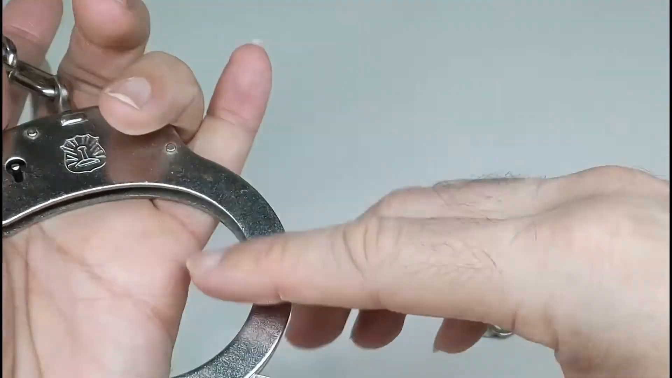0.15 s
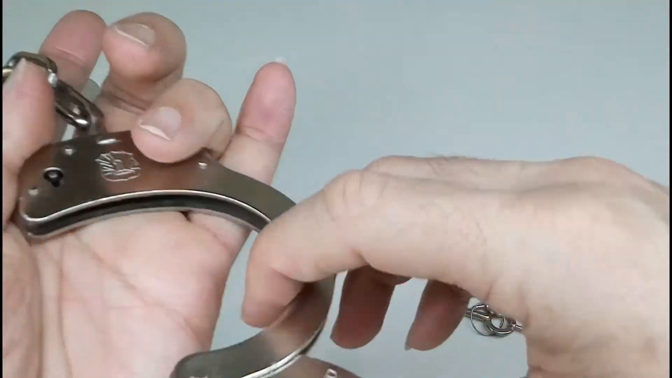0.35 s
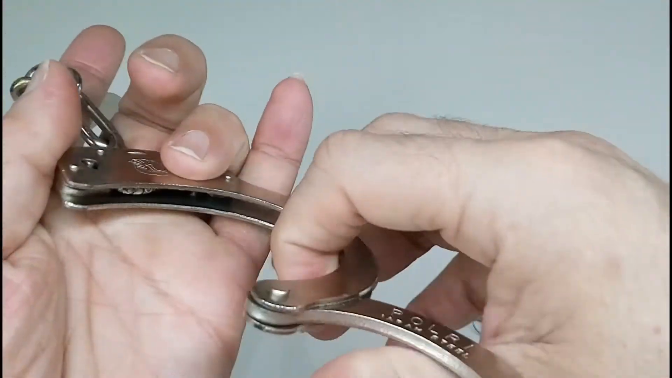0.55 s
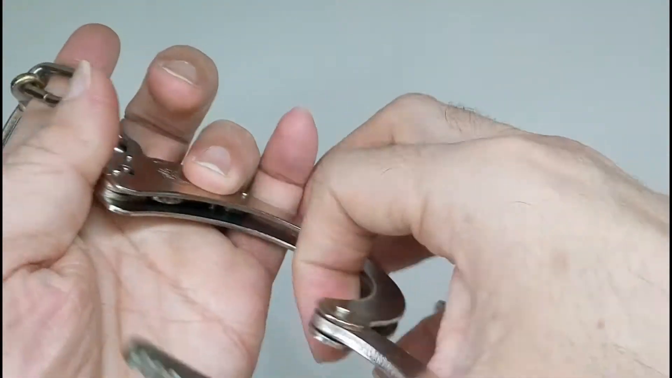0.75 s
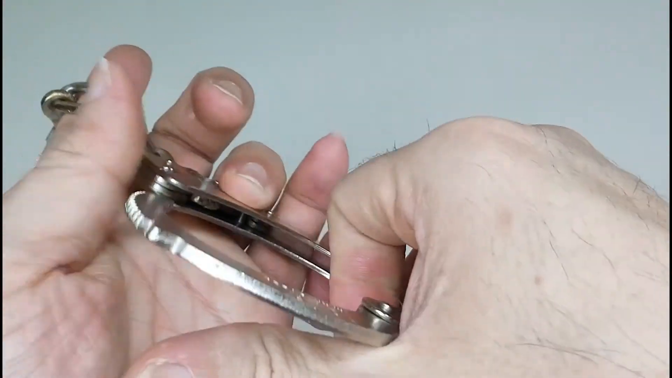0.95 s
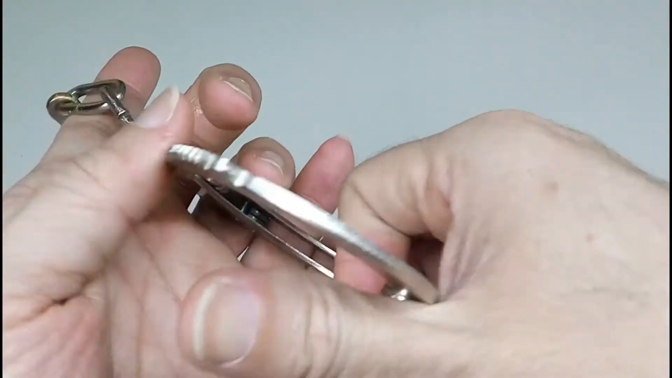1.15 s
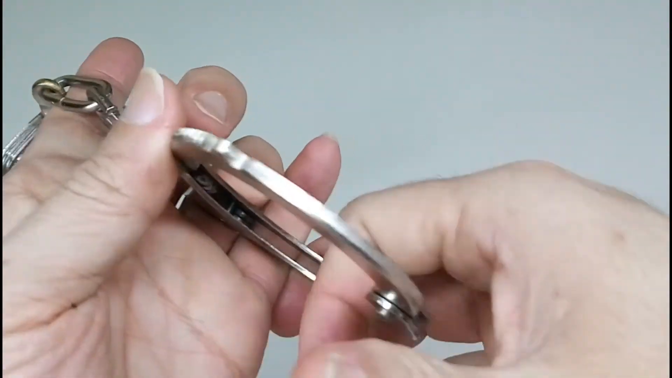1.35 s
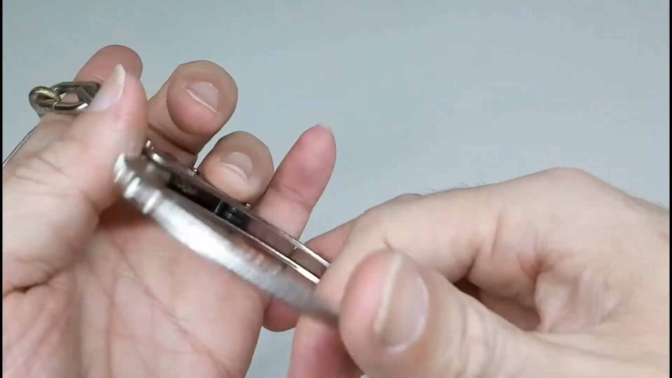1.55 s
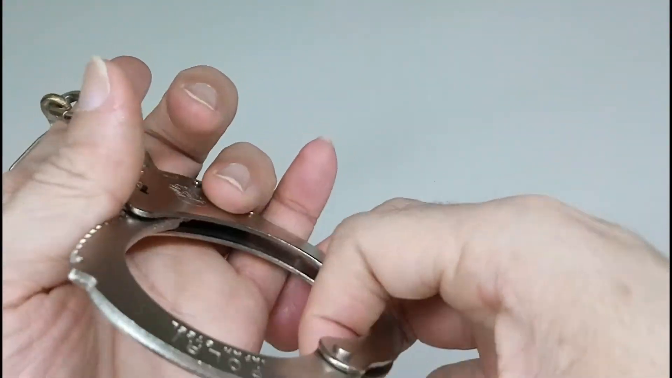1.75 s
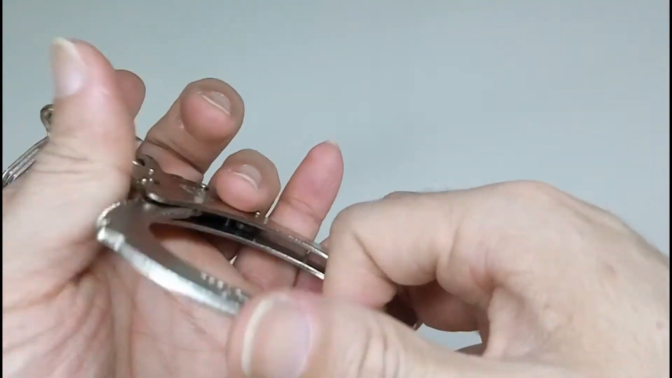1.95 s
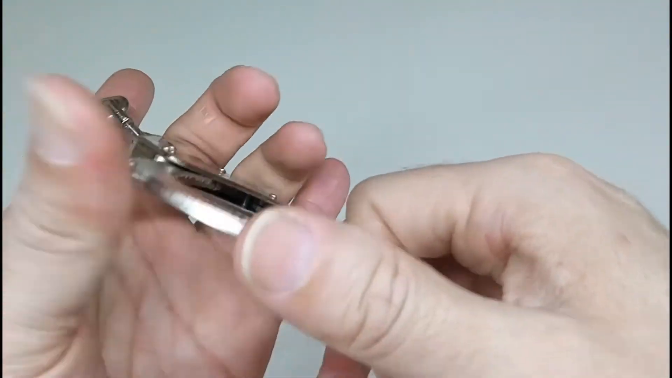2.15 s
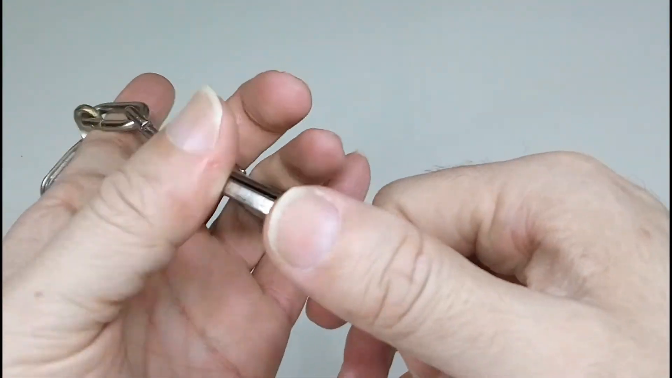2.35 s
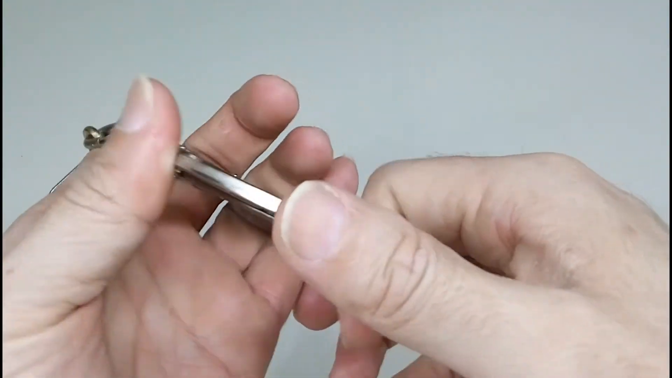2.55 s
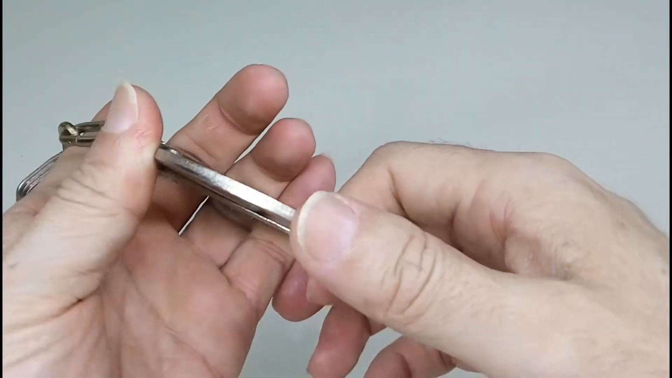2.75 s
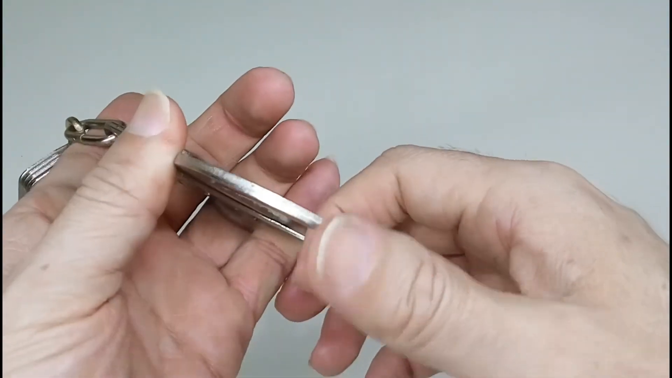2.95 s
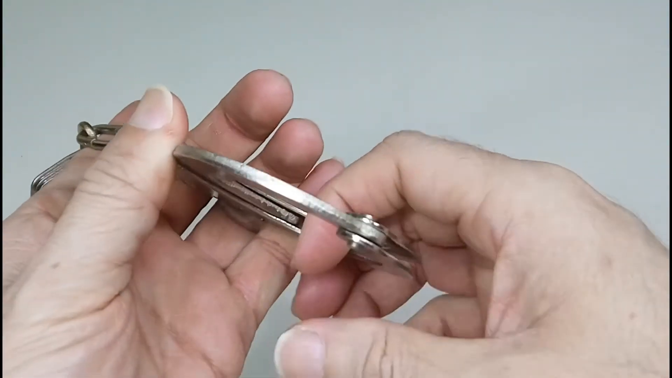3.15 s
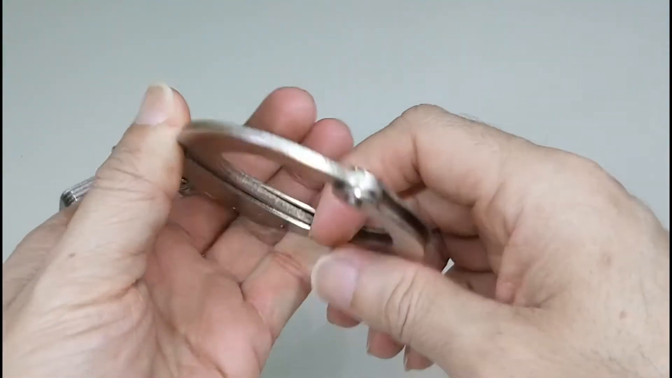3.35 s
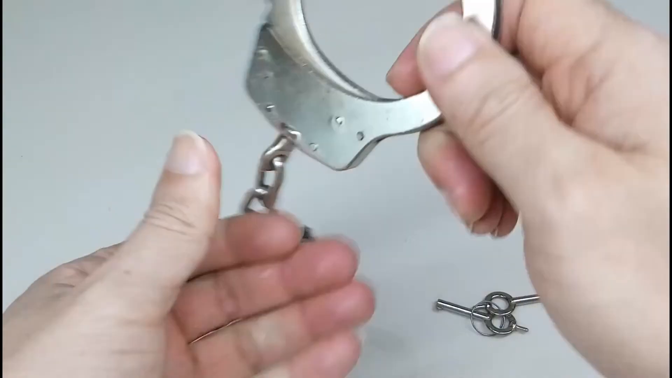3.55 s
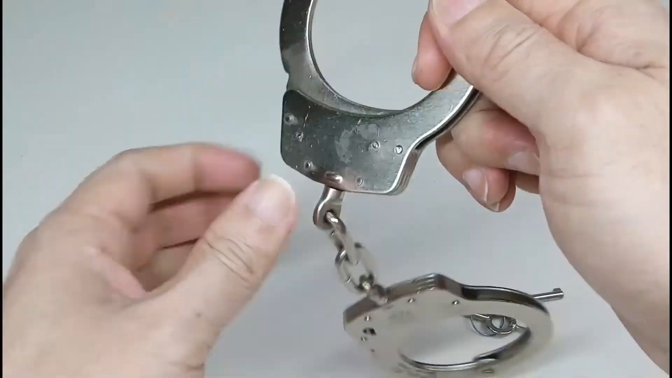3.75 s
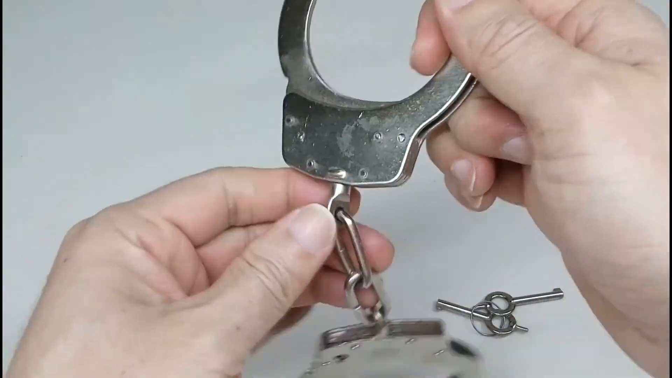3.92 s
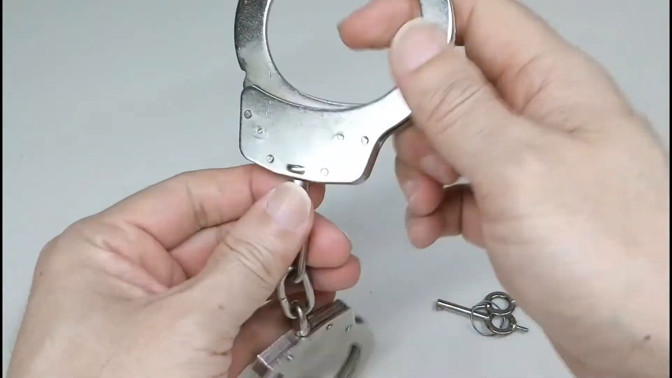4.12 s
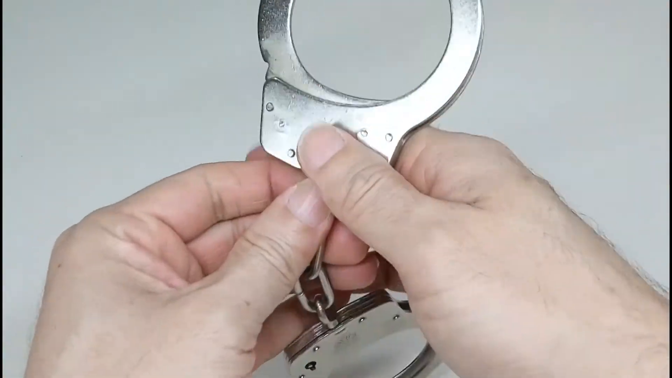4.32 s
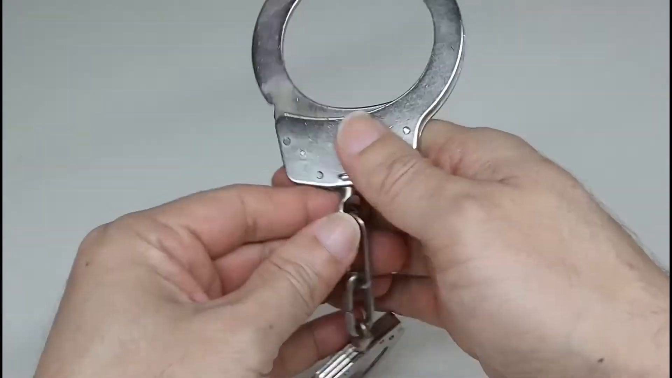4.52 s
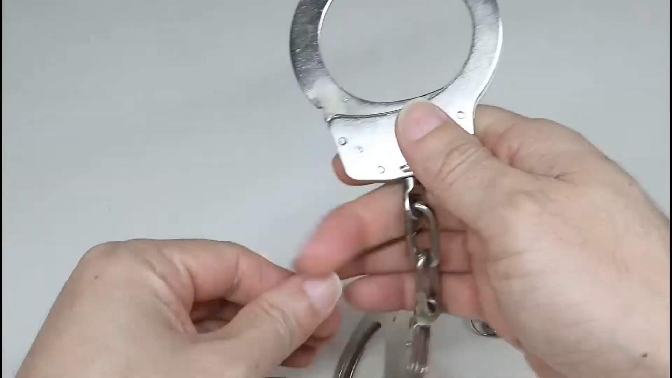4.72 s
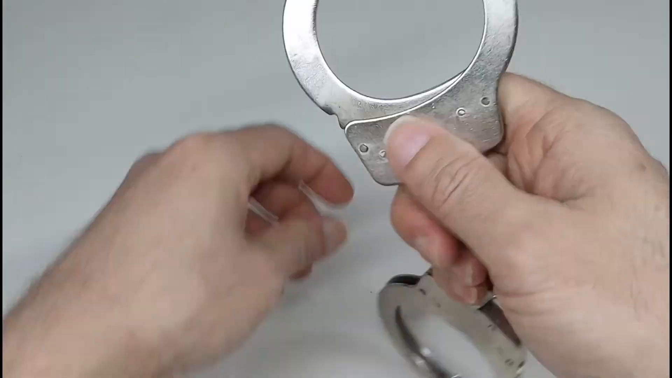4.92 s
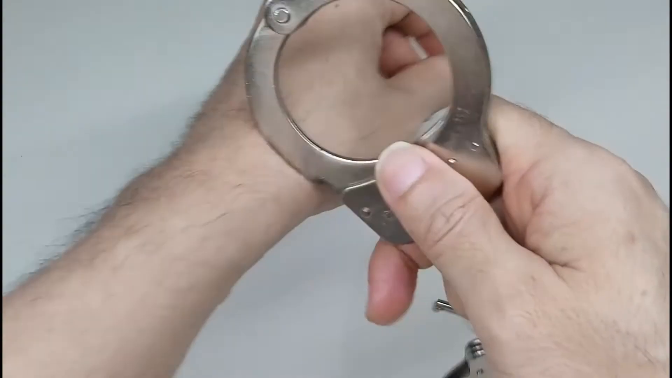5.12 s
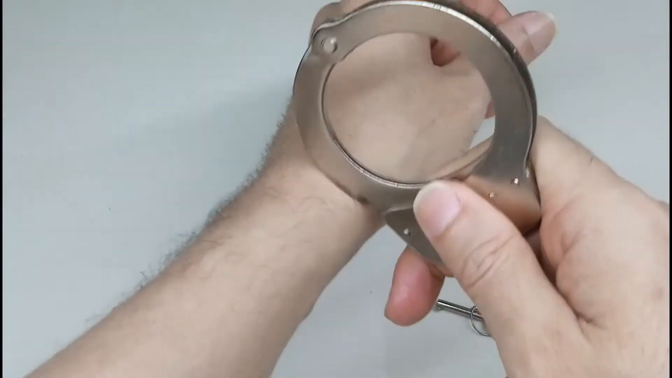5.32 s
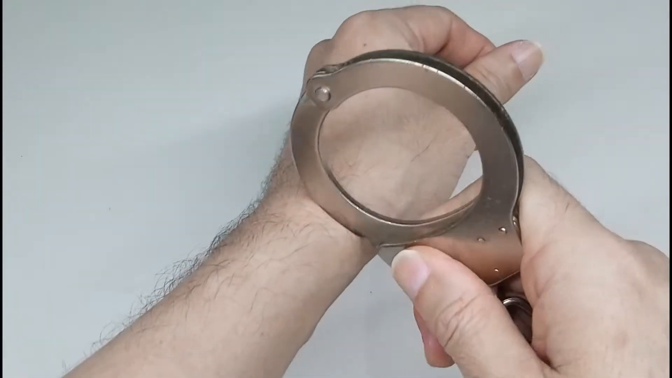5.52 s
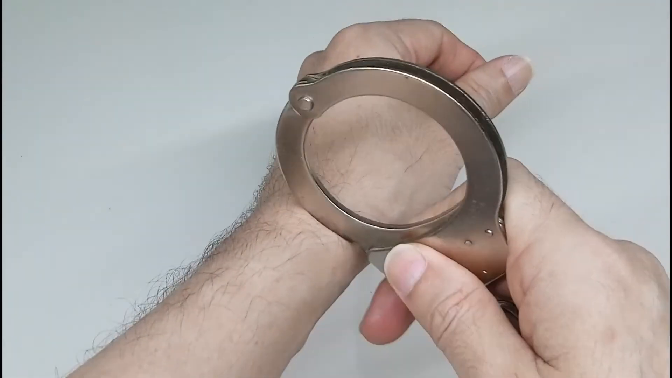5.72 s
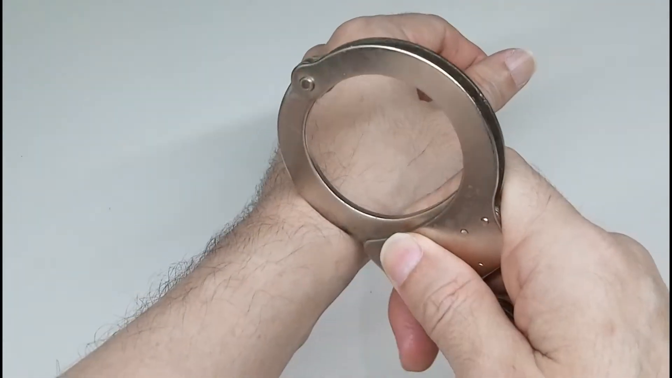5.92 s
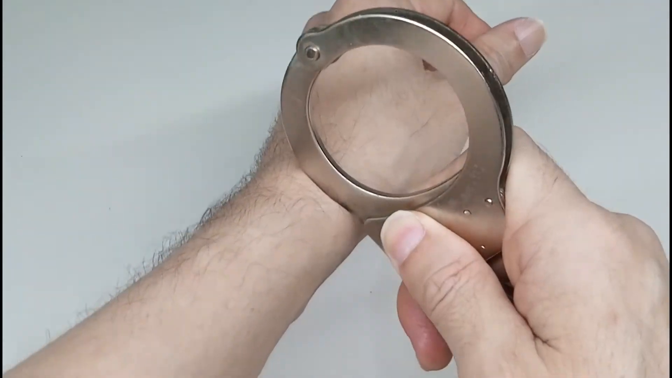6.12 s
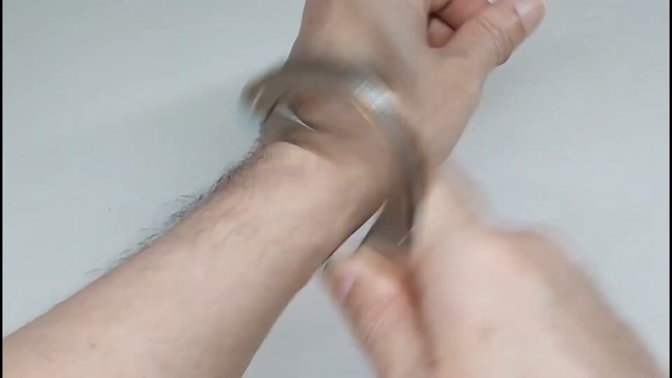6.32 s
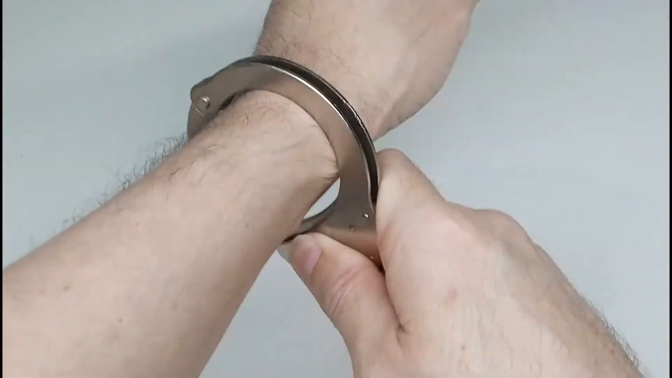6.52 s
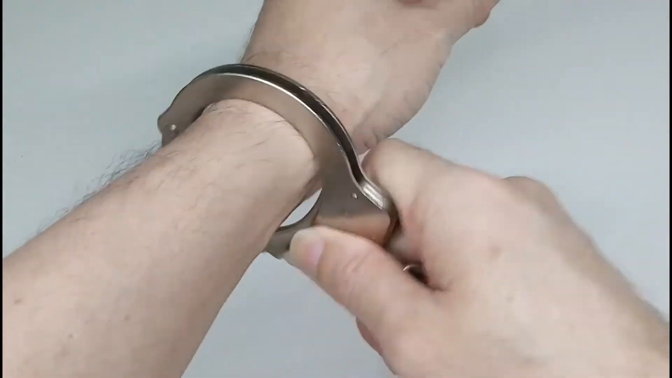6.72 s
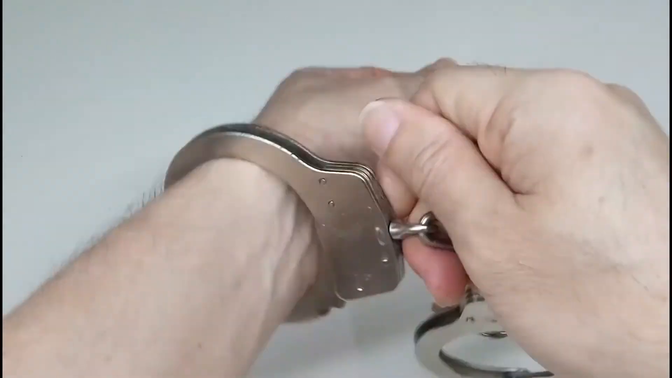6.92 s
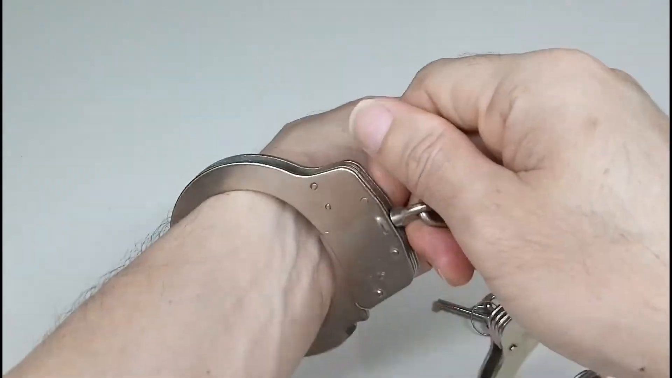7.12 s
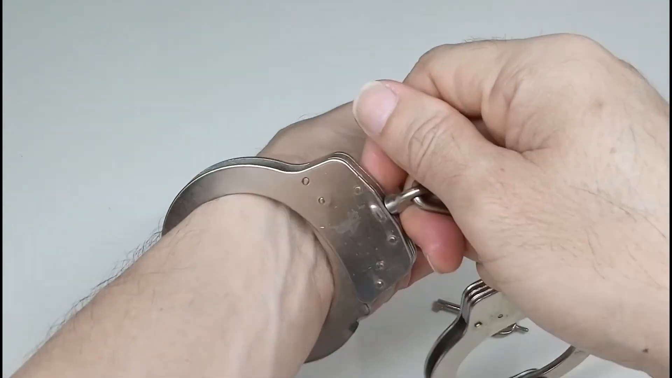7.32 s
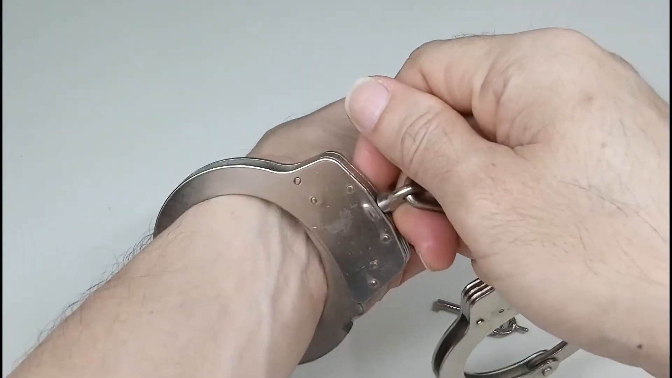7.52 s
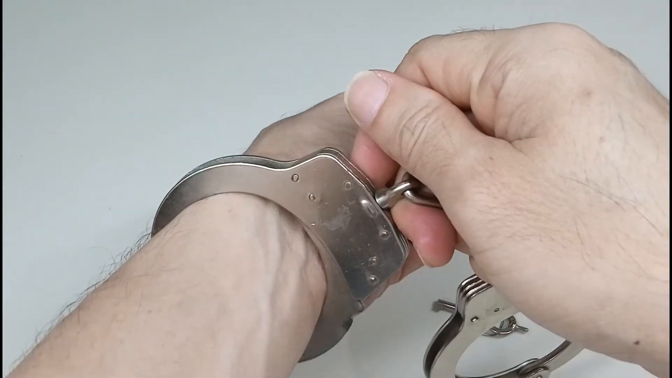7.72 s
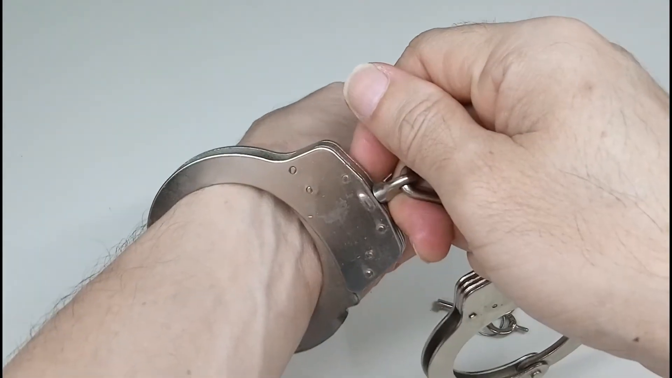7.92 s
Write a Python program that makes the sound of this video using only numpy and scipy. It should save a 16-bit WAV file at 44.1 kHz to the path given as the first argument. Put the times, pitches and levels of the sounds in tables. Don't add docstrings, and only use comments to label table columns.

```python
import sys
import numpy as np
from scipy import signal
from scipy.fft import rfft, irfft, next_fast_len
from scipy.io import wavfile
from scipy.ndimage import uniform_filter1d

SR = 44100
rng = np.random.default_rng(int(sys.argv[2]) if len(sys.argv) > 2 else 0)


def dump_mix(stems):
    frames = np.atleast_2d(stems).T
    limited = np.clip(frames, -1, 1)
    pcm = np.round(limited * 32767).astype(np.int16)
    wavfile.write(sys.argv[1], SR, pcm)


def volts_from_db(level):
    exponent = np.asarray(level, float) / 20
    return 10 ** exponent


N = 351477
HISS_TOP_HZ = 15550


def level(x, db):
    return x * volts_from_db(db) / np.sqrt(np.mean(x ** 2))


def fade(t, t60):
    return np.exp(-np.log(1000) * t / t60)


def low_pass(x, hz):
    return signal.sosfilt(signal.ellip(10, .2, 60, hz, fs=SR, output="sos"), x)


def coloured(spectrum):
    hz, db = np.transpose(spectrum)
    size = next_fast_len(N, True)
    f = np.fft.rfftfreq(size, 1 / SR) + 1
    gain = volts_from_db(np.interp(np.log(f), np.log(hz), db))
    noise = irfft(rfft(rng.standard_normal(size)) * gain, size)
    return level(noise[:N], 0)


def flutter(size, width_hz):
    pole = [1, -np.exp(-np.pi * width_hz / SR)]
    x = rng.standard_normal(size + 2000) + 1j * rng.standard_normal(size + 2000)
    for _ in range(3):
        x = signal.lfilter([1], pole, x)
    x = x[-size:]
    return x / np.sqrt(np.mean(np.abs(x) ** 2))


def add(out, s, sound):
    i = int(s * SR)
    out[i:i + len(sound)] += sound[:N - i]


def taps(rows, steady, crack_db, crack_t60, rise_s):
    # hz, db (per Hz)
    crack_colour = [(530, -51), (900, -23), (1520, -21), (1860, -14.5), (2600, -6), (3230, -7.5),
                    (3510, -1.5), (4980, -1.5), (8500, -17.5), (11000, -43), (18700, -120)]
    # hz, db (per Hz)
    treble_colour = [(5000, -39), (8000, -15), (9400, -1.5), (11500, -3), (12800, -5.5), (13900, -5),
                     (15000, 7), (15700, -5.5), (16300, -20)]
    out = np.zeros(N)
    t = np.arange(SR // 6) / SR
    crack, treble = coloured(crack_colour), coloured(treble_colour)
    for s, db, hz, treble_db, t60, width_hz in rows:
        i = int(s * SR)
        wobble = steady + (1 - steady) * flutter(len(t), width_hz)
        ring = (-1j * np.exp(2j * np.pi * hz * t) * wobble).real * fade(t, t60)
        burst = volts_from_db(crack_db) * crack[i:i + len(t)] + volts_from_db(treble_db - 5.0) * treble[i:i + len(t)]
        burst = burst * fade(t, crack_t60)
        add(out, s - rise_s, volts_from_db(db) * (1 - np.exp(-t / rise_s)) * (ring + burst))
    return out


def background():
    # hz, db (per Hz)
    air_colour = [(15, -48), (25, -20.5), (92, -2.5), (126, -10.5), (206, -7), (252, -14.5), (276, -7.5),
                  (338, -12), (479, -11), (703, -14), (830, -13.5), (943, -17.5), (2000, -23), (2600, -38),
                  (4400, -120)]
    # hz, db (per Hz)
    hiss_colour = [(1060, -22), (1800, -17), (2050, -23.5), (2240, -2.5), (2410, -2), (3320, -4.5),
                   (3810, -6), (4370, -7.5), (6240, -9.5), (6710, -13), (8360, -24), (13200, -24),
                   (14900, -15.5), (15600, -13.5), (16000, -27)]
    # pitch_hz, width_hz, level_db (rms)
    fan_tones = [(100, 24, -59.5), (212.7, 14, -68), (283.6, 6.2, -68.5), (579, 28, -71.5),
                 (753.4, 22, -67.5)]
    air_db, hiss_db = -52, -65
    t = np.arange(N) / SR
    air = volts_from_db(air_db) * coloured(air_colour)
    deep = signal.sosfiltfilt(signal.butter(2, 85, fs=SR, output="sos"), air)
    shake = volts_from_db(2.1 * flutter(N, 7.2).real)
    hiss = volts_from_db(hiss_db) * low_pass(coloured(hiss_colour), HISS_TOP_HZ)
    out = air + deep * (shake - 1) + hiss
    for hz, width_hz, db in fan_tones:
        tone = np.exp(2j * np.pi * hz * t) * flutter(N, width_hz)
        out += level(tone.imag, db)
    return out


def bumps():
    # centre_s, peak_db, pitch_hz, length_s
    soft_hits = [(.035, -40, 77, 0.051), (0.427, -43.5, 95, 0.029), (3.03, -40, 70, 0.033),
                 (3.156, -43, 80, 0.037), (3.414, -47, 70, 0.035), (3.636, -41.5, 93, 0.083),
                 (4.207, -41.5, 75, .04), (4.261, -32.5, 100, 0.027), (4.322, -39, 95, 0.059),
                 (4.392, -37, 80, 0.015), (4.464, -44, 70, 0.028), (4.637, -50, 55, .05),
                 (4.968, -25.5, 131, 0.012), (4.986, -26.5, 79, 0.043), (4.991, -35.5, 204, 0.034),
                 (5.017, -35, 77, 0.07), (6.36, -48.5, 187, 0.01), (6.403, -36, 240, 0.055),
                 (6.395, -29.5, 425, 0.017), (6.431, -29.5, 145, 0.013)]
    out = np.zeros(N)
    for s, db, hz, length in soft_hits:
        t = np.arange(-2 * length, 2 * length, 1 / SR)
        t = t[t + s > 0]
        swell = np.exp(-(4.26 * t / length) ** 2)
        add(out, s + t[0], volts_from_db(db) * swell * np.cos(2 * np.pi * hz * t))
    return out


def chain_rattles():
    # start_s, peak_db, ring_hz, treble_db
    loose = [(.2464, -69, 2530, -17), (0.76, -51.5, 6140, -26), (.804, -48, 6000, -27),
             (.8079, -55, 3220, -29), (1.239, -44.5, 5540, -20), (1.244, -46, 4900, -9),
             (1.276, -49, 5970, -24), (1.5834, -44.5, 4280, -9), (1.6333, -38, 5260, -18),
             (1.64, -50, 4840, -15), (3.7013, -52.5, 3920, -25), (3.899, -49.5, 4740, -27),
             (3.9956, -57, 4460, -22), (4.0394, -57, 4050, -20), (4.1932, -53, 2700, -22),
             (4.473, -41.5, 3600, -18), (4.484, -50, 3920, -24), (5.7368, -54, 3980, -22),
             (6.81, -55, 2900, -27), (6.956, -47, 4560, -32)]
    t60, width_hz = 0.043, 950
    rows = [(*row, t60, width_hz) for row in loose]
    return taps(rows, steady=0.19, crack_db=-4.5, crack_t60=0.034, rise_s=0.00033)


def scrapes():
    # start_s, length_s, level_db (rms), pitch_hz, width_hz
    slides = [
        (0.682, .085, -75, 6130, 250),
        (1.577, 0.05, -54, 5170, 2200),
        (2.314, 0.032, -58.5, 5100, 900),
    ]
    out = np.zeros(N)
    for s, length, db, hz, width_hz in slides:
        t = np.arange(0, length, 1 / SR)
        grain = flutter(len(t), width_hz) * volts_from_db(1.9 * flutter(len(t), 250).real)
        swell = np.sin(np.pi * t / length) ** 0.34
        add(out, s, level((np.exp(2j * np.pi * hz * t) * grain).imag * swell, db))
    return out


def link_clinks():
    # start_s, peak_db, ring_hz, t60_s
    pings = [
        (.804, -54, 6100, .04),
        (1.636, -51, 14800, .1),
        (1.6365, -54, 11700, .04),
        (4.4755, -46, 2840, 0.037),
        (4.4765, -49, 4000, 0.038),
        (4.5968, -38.5, 3990, 0.046),
        (4.821, -32, 4200, 0.072),
        (4.8205, -46, 6500, .03),
        (4.845, -52.5, 2120, 0.24),
    ]
    treble_db, width_hz = -35, 350
    rows = [(s, db, hz, treble_db, t60, width_hz) for s, db, hz, t60 in pings]
    return taps(rows, steady=0.47, crack_db=-13, crack_t60=0.02, rise_s=0.0002)


def knocks():
    # start_s, level_db (rms), low_hz, high_hz, t60_s
    thuds = [
        (0.8682, -29.5, 1490, 3260, 0.038),
        (6.346, -41, 150, 1360, 0.22),
        (6.3902, -31.5, 130, 1200, 0.086),
        (6.4261, -39, 130, 1190, 0.11),
        (6.4303, -22, 2080, 3150, 0.042),
    ]
    out = np.zeros(N)
    t = np.arange(SR // 5) / SR
    for s, db, low_hz, high_hz, t60 in thuds:
        band = signal.butter(2, (low_hz, high_hz), "bandpass", fs=SR, output="sos")
        noise = level(signal.sosfilt(band, rng.standard_normal(len(t))), db)
        add(out, s, noise * fade(t, t60) * (1 - np.exp(-t / 0.00015)))
    return out


def bounces(strikes, count):
    rebound_gap_s, rebound_loss_db = .0021, -9.5
    gap_scatter, rebound_scatter_db, ring_scatter = 0.11, -0.5, 0.042
    brush_lead_s, brush_db = .0018, -19
    s, db, hz, treble_db = np.array(strikes, float).T[:, :, None]
    gap, size, place = np.clip(rng.standard_normal((3, len(strikes), count)), -2, 2)
    rebounds = (s + rebound_gap_s * np.cumsum(1 + gap_scatter * gap, axis=1),
                db + rebound_loss_db * np.arange(1, count + 1) + rebound_scatter_db * size,
                hz * (1 + ring_scatter * place),
                treble_db + 0 * gap)
    brush = (s - brush_lead_s, db + brush_db, hz, treble_db)
    extra = [np.stack(part, axis=-1).reshape(-1, 4) for part in (brush, rebounds)]
    return np.concatenate([strikes] + extra)


def pawl_strikes():
    # start_s, peak_db, ring_hz, treble_db
    teeth = [(.8688, -21.5, 4740, -12), (.8775, -29, 5160, -11), (2.3645, -20, 2670, -9),
             (2.3655, -20.5, 5100, -12), (2.370, -11.5, 5170, -18), (2.3748, -23, 5300, -12),
             (2.3756, -20, 3700, -17), (2.379, -19, 5040, -14), (2.3828, -15.5, 5500, -12),
             (2.3875, -24, 5000, -16), (2.7336, -15, 4250, -14), (2.7365, -18.5, 4760, -13),
             (2.7415, -14, 4570, -19), (2.744, -19, 4900, -20), (2.748, -30, 4900, -14),
             (2.8325, -13, 3750, -19), (2.834, -17, 5060, -17), (2.8395, -14, 5170, -14),
             (2.8472, -33, 4950, -12), (2.8545, -30, 5200, -14), (2.9797, -18.5, 3000, -12),
             (2.9825, -16.5, 5400, -12), (2.9865, -42, 5100, -12), (2.990, -16, 5300, -14),
             (2.9925, -19.5, 4310, -19), (2.9965, -35, 4400, -18)]
    # start_s, peak_db, ring_hz, treble_db
    closing = [(6.3433, -16, 5600, -12), (6.345, -18, 4750, -13), (6.349, -11, 5300, -13),
               (6.352, -13, 4200, -11), (6.355, -11, 3920, -12), (6.361, -13, 4250, -14),
               (6.363, -28, 4920, -14), (6.37, -27, 3960, -12), (6.380, -25, 3830, -14),
               (6.39, -17, 3700, -20), (6.392, -7.5, 3500, -26), (6.396, -18, 3900, -15),
               (6.397, -18, 3860, -18), (6.4025, -26, 3530, -18), (6.4068, -21, 3800, -25),
               (6.4094, -21, 3700, -25), (6.4263, -12.5, 3740, -20), (6.427, -11.5, 4700, -17),
               (6.431, -10.5, 3700, -13), (6.4346, -11.5, 3190, -16), (6.438, -15.5, 2680, -14),
               (6.4405, -36, 5030, -14), (6.447, -29, 3750, -15)]
    return bounces([*teeth, *closing], count=2)


def lock_snaps(pawl):
    t60, width_hz = .013, 700
    rows = [(*row, t60, width_hz) for row in pawl]
    return taps(rows, steady=0.78, crack_db=-10.5, crack_t60=0.019, rise_s=0.00056)


def steel(pawl):
    # from_s, to_s, ring_db, steady_share (0-1), blur_hz
    grips = [
        (0, 2, -23, 0.1, 400),
        (2, 2.7, -24, .2, 350),
        (2.7, 2.8, -23, 0.45, 350),
        (2.8, 2.95, -28, 0.4, 250),
        (2.95, 3.5, -21, .2, 350),
        (6.001, 7, -25, 0.27, 300),
    ]
    # pitch_hz, level_db, t60_s
    open_modes = [(3300, -18, .12), (4900, 3, 0.12), (5400, -8, .1), (5640, 2, 0.079), (6500, -2, 0.088),
                  (6850, -1, 0.072), (7750, -5, 0.15), (9280, 1, 0.067), (13640, -13, .14), (14710, -9, .2)]
    # pitch_hz, level_db, t60_s
    first_modes = [(2760, -30.5, .2), (3700, -9, 0.19), (4500, -21, .25), (4900, -9, .2), (4980, 10, .14),
                   (5100, -3, .28), (5400, -17, .25), (5660, -3, 0.19), (6891, -18, .16), (10640, -31, .18),
                   (11750, -24, .19), (15270, -19, .14)]
    second_modes = [(3720, -16, .15), (4200, -10, .15), (4720, 4, 0.17), (5170, -8, 0.24), (5862, -21, .22),
                    (6560, 0, 0.1), (8726, -26, .3), (9905, -24, .22), (11680, -21, .13), (14720, -14, .12)]
    third_modes = [(3000, -20, 0.38), (4000, 0, 0.15), (4360, -20, 0.52), (5030, -8, 0.46),
                   (5140, -10, 0.32), (5292, -17, 0.8), (5730, -4, 0.15), (11600, -20, 0.34),
                   (13690, -25, 0.26), (14700, -15, 0.4)]
    fourth_modes = [(3560, -9, .18), (4030, -5, 0.22), (4550, -9, 0.19), (5100, -4, 0.16), (5600, -6, .14),
                    (6100, -8, .2), (7000, -1, 0.1), (9200, -19, .15), (11000, -21, .15), (14580, -22, .2)]
    # pitch_hz, level_db, t60_s
    wrist_modes = [(2830, -12, .2), (3220, -13, 0.33), (3810, -14, 0.4), (3670, -1.5, 0.41),
                   (3750, -1, 0.23), (4127, -2, .2), (4460, -12, .24), (4640, -14, .28), (5500, -4, 0.3),
                   (5300, -9, 0.24), (6160, -14, .23), (6800, -14, 0.3), (7260, -18, 0.35),
                   (9200, -18, 0.32), (11500, -24, .24), (13700, -18, .2), (14410, -22, .22),
                   (14740, -11, .22)]
    grip_modes = (open_modes, first_modes, second_modes, third_modes, fourth_modes, wrist_modes)
    out = np.zeros(N)
    for (t0, t1, ring_db, steady, blur_hz), modes in zip(grips, grip_modes):
        inside = pawl[(pawl[:, 0] > t0) & (pawl[:, 0] < t1)]
        start = inside[:, 0].min()
        where = ((inside[:, 0] - start) * SR).astype(int)
        blows = np.zeros(where.max() + SR // 2)
        blows[where] = volts_from_db(2 * inside[:, 1])
        t = np.arange(len(blows)) / SR
        wobble = steady + (1 - steady) * flutter(len(t) + SR, blur_hz)
        for k, (hz, db, t60) in enumerate(modes):
            energy = signal.lfilter([1], [1, -fade(2 / SR, min(t60, .45))], blows)
            swing = uniform_filter1d(np.sqrt(energy), size=40)
            ring = np.exp(2j * np.pi * hz * t) * wobble[2000 * k:][:len(t)]
            add(out, start, volts_from_db(db + ring_db) * swing * ring.imag)
    return out


def room(x):
    # hz, db
    walls = [(500, -7.5), (1500, 1), (3000, -4.5), (5000, -1), (6800, 2), (8500, -1), (12000, 2),
             (15000, -0.5)]
    tail_t60_s, top_t60_s, room_db = 0.39, 0.32, -11
    early_t60_s, early_db = 0.0556, -3
    t = np.arange(SR // 2) / SR
    noise = coloured(walls)[:len(t)]
    low = signal.sosfilt(signal.butter(2, 7500, fs=SR, output="sos"), noise)
    tail = low * fade(t, tail_t60_s) + (noise - low) * fade(t, top_t60_s)
    early = volts_from_db(early_db) * noise * fade(t, early_t60_s)
    echoes = (tail + early) * (1 - np.exp(-t / 0.0036))
    echoes = volts_from_db(room_db) * echoes / np.sqrt(np.sum(echoes ** 2))
    return low_pass(signal.fftconvolve(x, echoes)[:N], HISS_TOP_HZ)


def scene():
    pawl = pawl_strikes()
    metal = chain_rattles() + scrapes() + link_clinks() + knocks() + lock_snaps(pawl) + steel(pawl)
    return (metal + room(metal) + bumps() + background())[None]


def roll_off(x):
    return signal.sosfilt(signal.butter(12, 16650, fs=SR, output="sos"), x)


def record(dry):
    return roll_off(low_pass(dry, 15950))


dry = scene()
out = record(dry)
dump_mix(out)
```